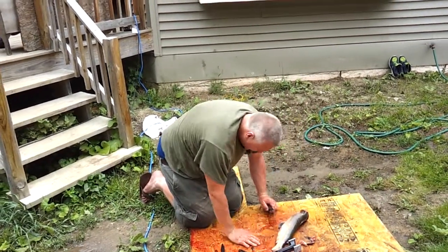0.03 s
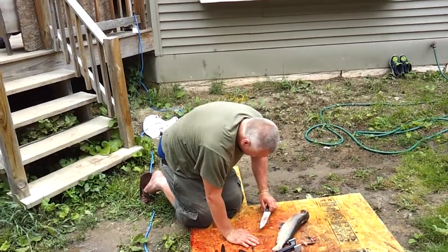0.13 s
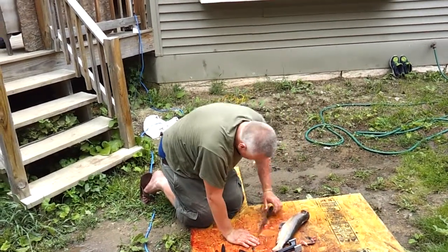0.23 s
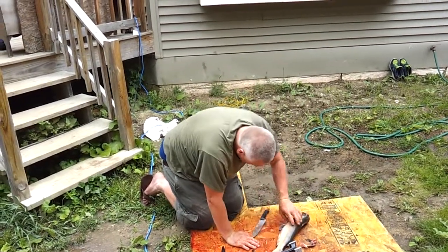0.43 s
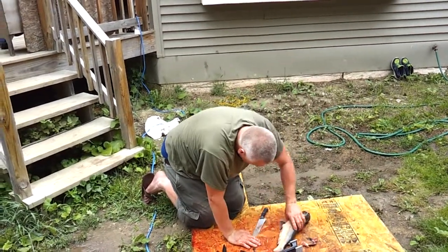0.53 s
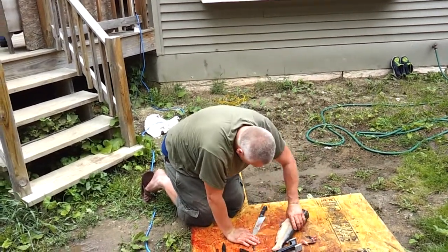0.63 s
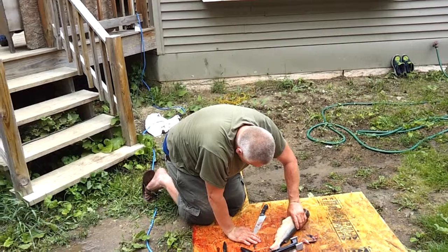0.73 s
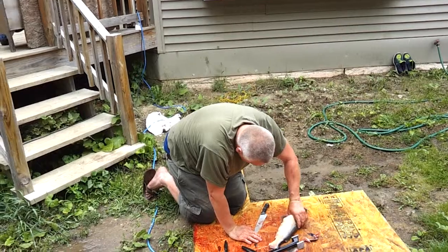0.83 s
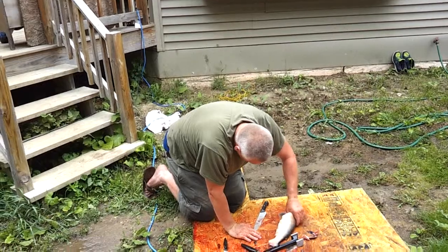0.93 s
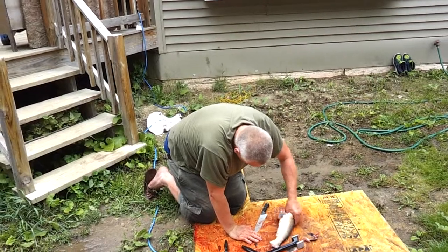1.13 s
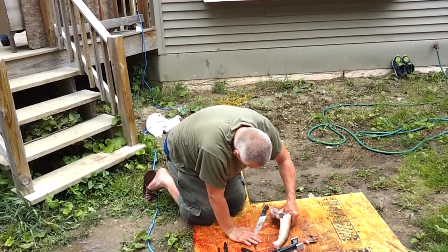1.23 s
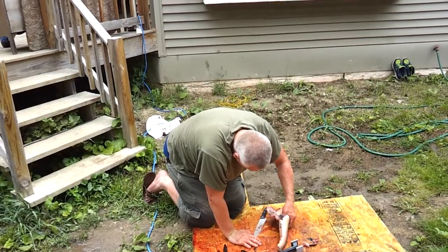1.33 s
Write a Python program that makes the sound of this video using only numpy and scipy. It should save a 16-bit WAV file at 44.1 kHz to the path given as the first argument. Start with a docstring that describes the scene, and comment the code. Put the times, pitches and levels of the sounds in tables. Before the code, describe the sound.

Knocks on a plywood board sound close by as a fish is handled. The loudest lands at about 0.25 seconds, slightly overloading the microphone, and a second at 0.4, both with small rebounds. Soft bumps and faint rubbing follow until 0.7. At about 1 second a short hissing scrape catches, ending in a sharp slip at 1.1. The yard returns quick echoes over a steady low rumble.

```python
"""A yard, beside a house wall: a fish is handled on a plywood board, over a low outdoor rumble.
The board rings under two hard knocks, with rebounds, then a few soft bumps as the fish is gripped.
A short scrape hisses with friction, catches, slides and ends in a sharp slip as the skin snaps free.
Wall, steps and ground send back quick echoes; the loudest moments overload the microphone."""
import sys
import numpy as np
from scipy import signal
from scipy.fft import rfft, irfft, next_fast_len
from scipy.io import wavfile

SR = 44100
rng = np.random.default_rng(int(sys.argv[2]) if len(sys.argv) > 2 else 0)


def generate_wav(signal):
    """Clip the signal to [-1, 1] and save it as 16-bit WAV at the path in sys.argv[1]."""
    frames = np.transpose(np.atleast_2d(signal))
    scaled = np.clip(frames, -1, 1) * 32767
    pcm = np.round(scaled).astype(np.int16)
    wavfile.write(sys.argv[1], SR, pcm)


N = 61739


def amp(db):
    """Decibels to gain."""
    return 10 ** (np.asarray(db) / 20)


def unit(x):
    """Scale to rms 1."""
    return x / np.sqrt(np.mean(x ** 2) + 1e-20)


def along(points, hz):
    """Read a curve of (Hz, value) points on a log frequency axis."""
    freqs, values = np.transpose(points)
    return np.interp(np.log(hz + 1), np.log(freqs + 1), values)


def filtered(x, response):
    """Filter x by a gain given as a function of Hz."""
    size = next_fast_len(N + SR // 2)
    return irfft(rfft(x, size) * response(np.fft.rfftfreq(size, 1 / SR)), size)[:N]


def coloured(x, spectrum):
    """Filter x by a curve of (Hz, dB) points."""
    return filtered(x, lambda hz: amp(along(spectrum, hz)))


def noise(spectrum):
    """Coloured noise of rms 1."""
    return unit(coloured(rng.standard_normal(N), spectrum))


def band(hz, width_hz):
    """Narrow noise of rms 1."""
    return unit(filtered(rng.standard_normal(N), lambda f: np.exp(-((f - hz) / width_hz) ** 2)))


def since(start):
    """Seconds since start, for every sample."""
    return np.arange(N) / SR - start


def fade(start, t60):
    """An envelope that jumps to 1 at start and falls 60 dB in t60 seconds."""
    t = since(start)
    return (t >= 0) * amp(-60 * np.abs(t) / t60)


def swell(peak_s, half_s):
    """A bell-shaped rise and fall around peak_s."""
    return np.exp(-(since(peak_s) / half_s) ** 2 / 2)


def burst(peak_s, rise_s, t60):
    """An envelope that grows quickly to its peak and dies away."""
    t = since(peak_s)
    return fade(peak_s, t60) + (t < 0) * np.exp(-np.abs(t) / rise_s)


# The open air around the microphone. Each row: frequency in Hz, relative level in dB.
AIR_SPECTRUM = [(15, -16), (28, 1), (48, 2), (70, 0), (100, -2), (130, -4), (190, -6), (272, -15.5),
                (380, -17), (550, -21.5), (1200, -23.5), (1650, -24), (2200, -29.5), (4000, -33),
                (6700, -32.5), (8200, -24.5), (9500, -31.5), (11500, -34)]


def outdoor_air():
    """Steady rumble and hiss; a faint fuzzy whistle and a low drone come and go."""
    whistle = amp(-56) * band(hz=1730, width_hz=67) * swell(peak_s=0.944, half_s=0.084)
    drone = amp(-50) * band(hz=189.5, width_hz=3.3) * swell(peak_s=1.35, half_s=0.069)
    return amp(-40) * noise(AIR_SPECTRUM) + whistle + drone


# How long the yard rings on. Each row: frequency in Hz, time to fall 60 dB in seconds.
YARD_DECAY = [(100, 0.29), (350, 0.46), (900, 0.34), (1600, 0.34), (4000, 0.48), (10000, 0.14)]
# The tone of the echoes at the microphone. Each row: frequency in Hz, gain in dB.
ECHO_COLOUR = [(100, -1.5), (350, -6), (900, -3.5), (1500, 1), (3000, -9), (10000, -10.5)]


def yard_echoes(direct):
    """Wall, steps and ground a few metres off scatter a short cluster of echoes; a weak tail follows."""
    tail_from_s, walls_from_s, walls_to_s = 0.012, 0.0094, 0.048
    hz, t, spectra = signal.stft(rng.standard_normal(SR // 2), SR, nperseg=256)
    decay = amp(-60 * t / along(YARD_DECAY, hz)[:, None])
    _, tail = signal.istft(spectra * decay, SR, nperseg=256)
    tail = np.pad(tail / np.linalg.norm(tail), (round(tail_from_s * SR), N))[:N]
    walls = rng.standard_normal(N) * fade(walls_from_s, t60=0.13) * (since(walls_to_s) < 0)
    response = amp(-19.5) * tail + amp(-10) * walls / np.linalg.norm(walls)
    return signal.fftconvolve(direct, coloured(response, ECHO_COLOUR))[:N]


# The hand on fish and board. Each row: peak time in seconds, level in dB, half length in seconds.
HAND_RUBS = [(0.087, -50.5, 0.016), (0.264, -38.5, 0.0067), (0.312, -43.5, 0.021), (0.416, -43, 0.012),
             (0.535, -42, 0.01), (0.678, -43.5, 0.027)]
# The thin hiss of a rub. Each row: frequency in Hz, relative level in dB.
RUB_SPECTRUM = [(500, -21), (1500, -25), (3000, -2.5), (6000, 2.5), (8300, 7.5), (10000, 3), (11800, -0.5)]


def hand_rubs():
    """Faint brushing as the hand moves and grips."""
    envelope = sum(amp(db) * swell(peak_s, half_s) for peak_s, db, half_s in HAND_RUBS)
    return envelope * noise(RUB_SPECTRUM)


# The course of the scrape. Each row: time in seconds, level in dB.
SCRAPE_STROKE = [(.985, -49), (1.026, -41.5), (1.029, -24.5), (1.044, -33), (1.084, -25), (1.092, -20),
                 (1.095, -17.5), (1.102, -18.5), (1.114, -43), (1.134, -41), (1.15, -82)]
# The bright hiss of sliding. Each row: frequency in Hz, relative level in dB.
SCRAPE_SPECTRUM = [(300, -16), (1500, -24), (3300, -15), (4300, -17), (5000, -5.5), (7400, -4.5),
                   (8300, 2.5), (9300, -14.5), (11800, -14.5)]


def scrape():
    """Dense friction grains and a smooth hiss rise and fall with the stroke."""
    grains_per_s, spread_db, hiss_db = 1800, 3, -2.5
    grains = (rng.random(N) < grains_per_s / SR) * amp(spread_db * rng.standard_normal(N))
    grains *= np.sign(rng.standard_normal(N))
    friction = unit(grains) + amp(hiss_db) * rng.standard_normal(N)
    times, db = np.transpose(SCRAPE_STROKE)
    sliding = (since(times[0]) > 0) & (since(times[-1]) < 0)
    stroke = amp(np.interp(since(0), times, db)) * sliding
    return stroke * unit(coloured(friction, SCRAPE_SPECTRUM))


# Catches along the scrape. Each row: peak time in seconds, level in dB, rise and t60 in seconds.
CATCHES = [(.998, -47, .0004, 0.0098), (1.0164, -28, .0003, .008), (1.0176, -41, .0003, .008),
           (1.0275, -16, 0.00016, 0.0041), (1.094, -9.5, 0.002, 0.023), (1.095, -7, 0.002, 0.023),
           (1.1057, -26, 0.00099, 0.015), (1.1092, -22, .001, 0.0089)]
# The sharp hiss of a catch letting go. Each row: frequency in Hz, relative level in dB.
CATCH_SPECTRUM = [(100, -12), (1500, -27), (3000, -11.5), (4200, -12), (5200, -3.5), (7000, 2), (8700, 7.5),
                  (10000, -1.5), (11800, -3)]
# The fuller flick of the skin. Each row: frequency in Hz, relative level in dB.
FLICK_SPECTRUM = [(100, 0.5), (600, -9), (1200, -6), (1600, -11), (2200, 4), (2650, -10.5), (3000, -1),
                  (4200, 3.5), (7000, -8.5), (11800, 0)]


def skin_slips():
    """The skin catches and lets go in bright bursts, and snaps free with a flick."""
    catches = sum(amp(db) * burst(peak_s, rise_s, t60) for peak_s, db, rise_s, t60 in CATCHES)
    flick = amp(-3) * burst(peak_s=1.097, rise_s=0.00052, t60=0.012)
    return catches * noise(CATCH_SPECTRUM) + flick * noise(FLICK_SPECTRUM)


# Blows on the board. Each row: start in seconds, level in dB, hardness as a treble cutoff in Hz.
BLOWS = [(.078, -32.5, 450), (0.2387, -3.5, 1960), (.2410, 1.5, 1224), (0.257, -17, 1900),
         (0.2598, 0.5, 490), (0.2769, -18.5, 1800), (0.293, -15, 383), (0.3184, -25.5, 2020),
         (.3895, -18.5, 990), (0.403, -16.5, 2920), (0.405, -2.5, 778), (.4190, -13, 493),
         (.4250, -20.5, 1667), (.4430, -20, 550), (0.4524, -21, 1250), (.5015, -27.5, 3080),
         (0.5031, -19.5, 450), (0.5293, -13, 407), (0.58, -33, 2560), (0.599, -13.5, 385),
         (.6270, -22.5, 380), (0.6506, -21, 396), (.6590, -21, 430)]
# The modes of the plywood. Each row: frequency in Hz, relative level in dB, t60 in seconds.
PLYWOOD_MODES = [(253.4, -18.5, 0.071), (306.9, -7.5, 0.052), (371.7, -4, .044), (602, -12.5, 0.043),
                 (718, -9.5, 0.034), (777.4, -5.5, 0.039), (837, -6.5, 0.034), (1050, -15.5, 0.071),
                 (1290, -18.5, 0.01), (1371, -5, 0.026), (1600, -9, 0.035), (2030, -23, 0.016),
                 (3200, -20, .02)]
# The broad crack of a blow. Each row: frequency in Hz, relative level in dB.
CRACK_SPECTRUM = [(40, -6.5), (150, -4.5), (300, 0), (750, -0.5), (1400, -4), (2000, 2.5), (2600, -8),
                  (4200, -6), (7000, -35)]
# The bright tick of surface on surface. Each row: frequency in Hz, relative level in dB.
TICK_SPECTRUM = [(300, -20), (1500, -6.5), (3500, 13), (6000, -4.5), (12000, -13)]


def board_knocks():
    """Each blow rings the board; hard ones also crack and tick, soft ones reach only the low modes."""
    attack_s, scatter_db = 0.0011, 3.2
    radiate_hz = 184  # the board radiates little below this
    hard_hz = 1690  # softer contacts than this crack and tick less and less
    t = np.arange(SR // 4) / SR
    hz, db, t60 = np.transpose(PLYWOOD_MODES)[:, :, None]
    modes = amp(db - 60 * t / t60) * np.sin(2 * np.pi * hz * t) * (1 - np.exp(-t / attack_s))
    modes = signal.lfilter(*signal.butter(2, radiate_hz, "high", fs=SR), modes)
    crack = amp(-10.5) * noise(CRACK_SPECTRUM)
    tick = amp(-23.5) * noise(TICK_SPECTRUM)
    knocks = np.zeros(N)
    for start, level_db, cutoff_hz in BLOWS:
        ring = amp(scatter_db * rng.standard_normal(len(modes))) @ modes
        ring = np.pad(ring, (round(start * SR), N))[:N]
        hardness = min(cutoff_hz / hard_hz, 1)
        contact_lowpass = signal.butter(3, cutoff_hz, fs=SR, output="sos")
        body = signal.sosfilt(contact_lowpass, ring + hardness * crack * fade(start, t60=0.055))
        knocks += amp(level_db) * (body + hardness ** 2 * tick * fade(start, t60=0.032))
    return knocks


def scene():
    """Board and fish near the microphone, the yard's echoes and the open air behind them, in mono."""
    near = board_knocks() + scrape() + skin_slips() + hand_rubs()
    return (near + yard_echoes(near) + outdoor_air())[None]


def record(dry):
    """The top treble above 12 kHz is cut and the peaks clip; a band limit trims the distortion."""
    treble_cutoff_hz, ceiling, band_limit_hz = 11950, 0.75, 15940
    heard = filtered(dry[0], lambda hz: 1 / (1 + (hz / treble_cutoff_hz) ** 160))
    clipped = heard / (1 + np.abs(heard / ceiling) ** 10) ** (1 / 10)
    return filtered(clipped, lambda hz: 1 / (1 + (hz / band_limit_hz) ** 200))[None]


dry = scene()
out = record(dry)
generate_wav(out)
```